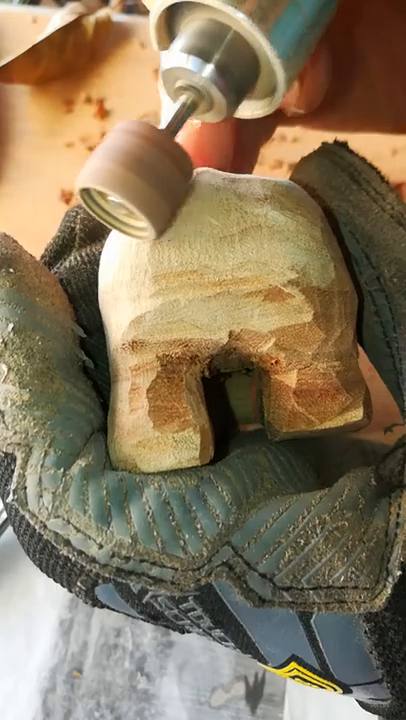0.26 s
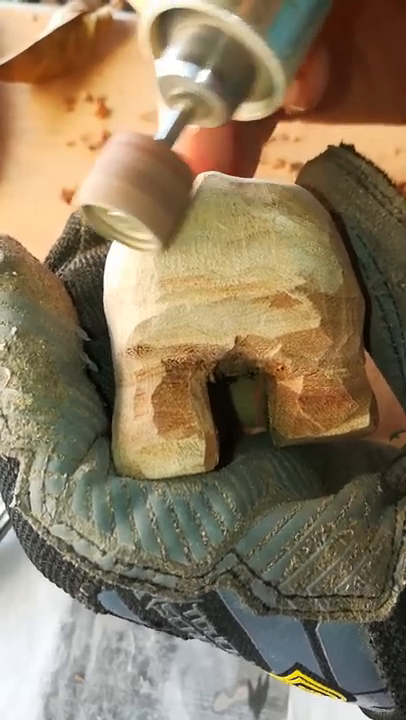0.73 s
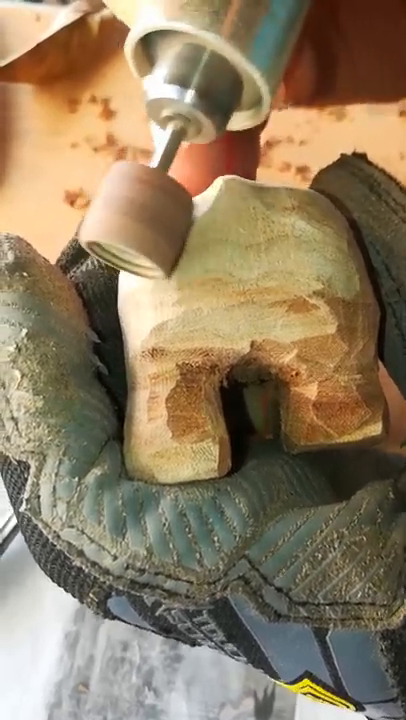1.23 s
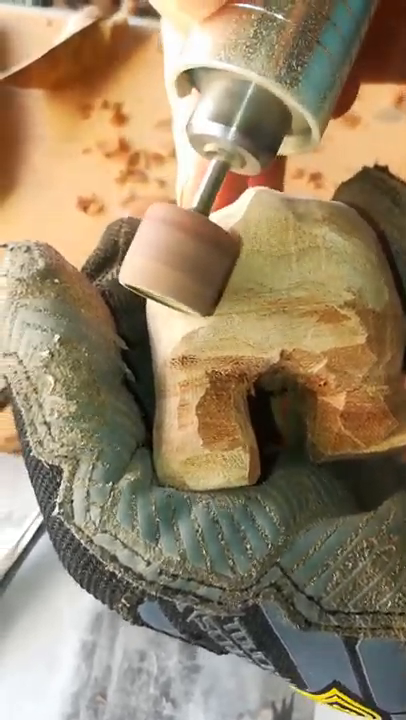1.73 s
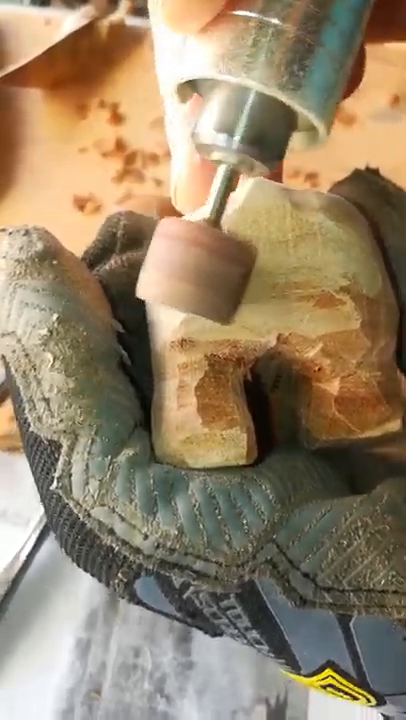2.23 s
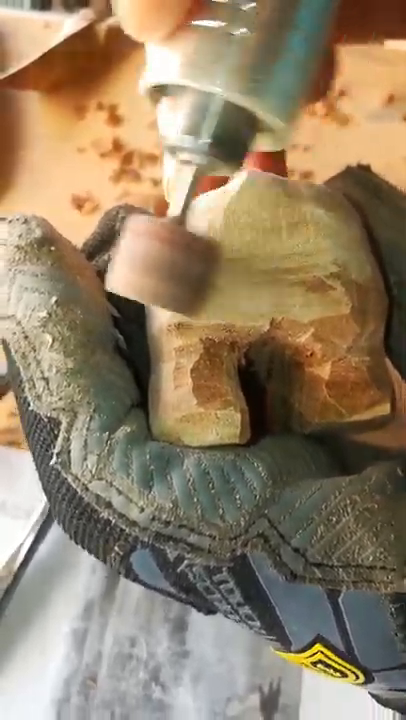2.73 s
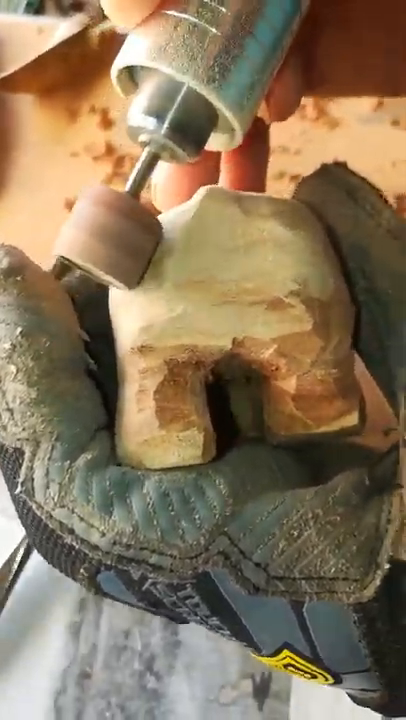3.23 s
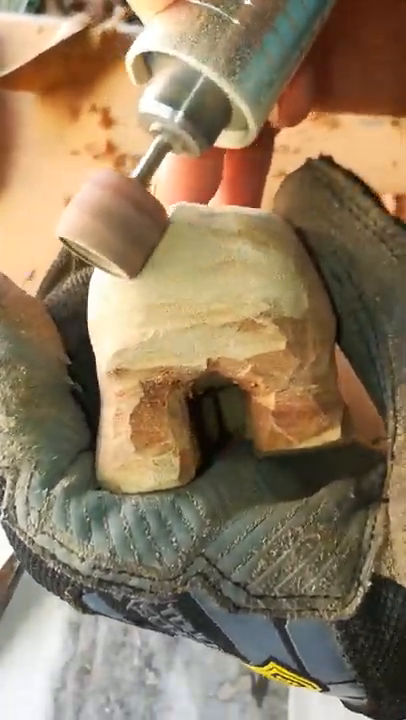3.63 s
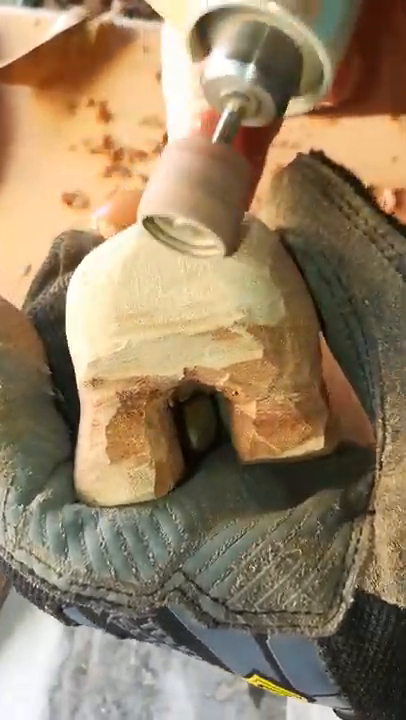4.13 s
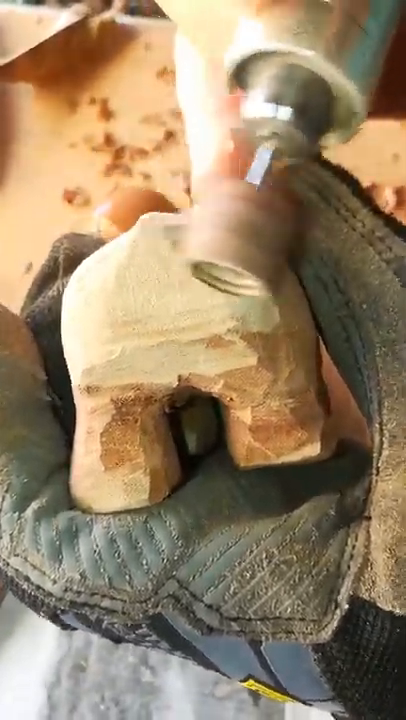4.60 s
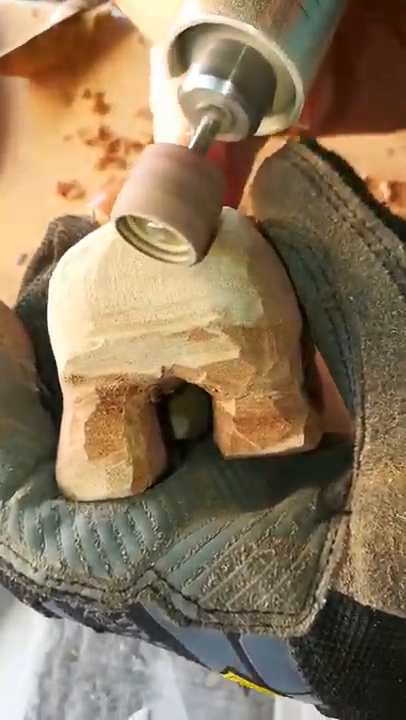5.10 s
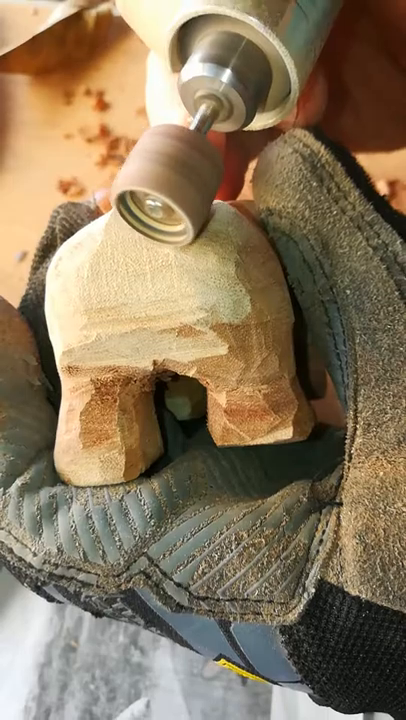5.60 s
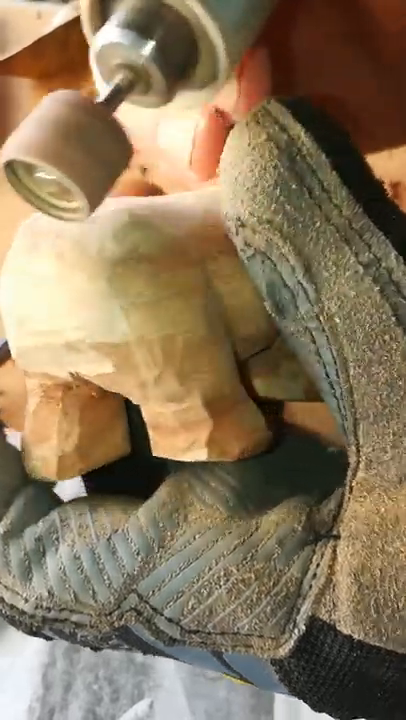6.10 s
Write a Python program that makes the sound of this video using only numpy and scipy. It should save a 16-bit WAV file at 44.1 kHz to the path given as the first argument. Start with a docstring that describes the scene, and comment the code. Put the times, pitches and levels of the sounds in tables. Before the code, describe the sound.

Close stereo sound of a small rotary tool sanding a hand-held wood carving, running continuously for about 6.3 seconds. A bright, grainy hiss dominates, pulsing very fast with the drum and ringing in the upper range; the left is edgier, the right finer. Beneath is a hum around 255 hertz with a buzzing knock, mostly left. Pressure grows, and from 1.5 to 1.8 and 2.1 to 2.4 seconds the drum skips, adding a rougher, lower growl, with a fainter trace near 2.8. The cut is hardest around 2.4. Soft, low handling bumps cluster from 2.8 to 3.8. At 3.8 to 4.2 the tool lifts: the buzz drops, the hiss softens slightly, and short bearing rattles chirp. Sanding resumes lighter; further lifts from 5.6 to 6.2 bring more rattles and a brief sharp bite near 5.9. Faint rumble and wavering low hum lie underneath.

```python
"""Grit scratches steadily as a small rotary tool sands a hand-held wood carving close to a two-port microphone.
The scratch is noise pulsing with the drum's turning; it rings the handpiece and the wood. Tones locked to
the shaft make the hum and the knock, and half orders come in as the drum skips every second turn.
The hand presses, tilts and lifts the tool; the loose bearing rattles mostly around the lifts.
Soft handling bumps come mostly midway, over a restless rumble, a faint hum and the workshop."""
import sys
import numpy as np
from scipy import signal
from scipy.fft import rfft, irfft
from scipy.io import wavfile
from scipy.ndimage import uniform_filter1d, map_coordinates

SR = 44100
rng = np.random.default_rng(int(sys.argv[2]) if len(sys.argv) > 2 else 0)


def master(y):
    """Save y as 16-bit WAV."""
    cut = np.clip(np.atleast_2d(y).T, -1, 1)
    pcm = np.round(cut * 32767)  # scale
    wavfile.write(sys.argv[1], SR, pcm.astype(np.int16))


N = 280035
T = np.arange(N) / SR
HZ = np.fft.rfftfreq(N, 1 / SR)
PORT_LAG_SAMPLES = 24  # the right port hears later


def gain_of(db):
    """Decibels to amplitude."""
    return 10 ** (np.asarray(db) / 20)


def evened(x):
    """Scales to rms 1."""
    return x / np.sqrt(np.mean(x ** 2) + 1e-20)


def curve(rows):
    """Each column of a time table, sample by sample."""
    s, *columns = np.transpose(rows)
    return np.squeeze([np.interp(T, s, c) for c in columns])


def spectrum(rows):
    """Each dB column of a frequency table as a gain per bin."""
    hz, *columns = np.transpose(rows)
    return gain_of([np.interp(np.log(HZ + 1), np.log(hz), c) for c in columns])


def colour(x, gain):
    """Filters by a gain per bin."""
    return irfft(rfft(x) * gain, N)


def highpass(corner_hz, power):
    """Gain per bin that falls away below a corner, where it is one half."""
    return HZ ** power / (HZ ** power + corner_hz ** power)


def peak(hz, width_hz):
    """A resonance of gain 1; the width is taken 3 dB down."""
    return 1 / (1 + ((HZ - hz) / (.78 * width_hz)) ** 2)


def drift(rate_hz):
    """Slow chance of rms 1: noise without its faster part, drawn at 1/64 of the rate."""
    slow = T[::64]
    hz = np.fft.rfftfreq(len(slow), slow[1])
    lines = rfft(rng.standard_normal(len(slow))) / (1 + (hz / rate_hz) ** 4)
    return evened(np.interp(T, slow, irfft(lines, len(slow))))


def ports(x, likeness):
    """Two unrelated signals become a partly alike pair; the right port hears the shared part later."""
    c = np.clip(likeness, 0, 1)
    return np.array([x[0], c * np.roll(x[0], PORT_LAG_SAMPLES) + np.sqrt(1 - c * c) * x[1]])


def burst(s, length_s):
    """A bell-shaped swell around time s; the length is its width at 1/e."""
    return np.exp(-(2 * (T - s) / length_s) ** 2)


def swells(rows):
    """A gain that rises or dips briefly at each row."""
    return gain_of(sum(db * burst(s, length_s) for s, length_s, db in rows))


def held(start_s, end_s, edge_s):
    """1 between two times, with smooth edges."""
    return .5 + .5 * np.sin(np.pi * np.clip(np.minimum(T - start_s, end_s - T) / edge_s, -.5, .5))


def follow(law, grip, waver_db, waver_hz=6):
    """A part's gain from pressure, lift and tilt; it wavers as the contact point shifts.

    Each law: level in dB at 0 dB pressure, dB per dB of pressure, dB when fully lifted, dB when fully tipped up.
    """
    db, slope, lifted_db, tilt_db = law
    pressure_db, lifted, tilt = grip
    level_db = db + slope * pressure_db + lifted_db * lifted + tilt_db * tilt
    return gain_of(level_db + waver_db * drift(waver_hz))


# Shaft speed before flutter. Each row: time in seconds, turns per second.
SPIN = [(0, 260), (.58, 256.3), (.97, 256.8), (1.4, 254.2), (2.3, 253.2), (3.2, 252.6), (3.85, 252.2),
        (4.19, 256), (4.29, 252), (4.37, 259.5), (4.44, 253), (4.59, 258), (4.67, 254.4), (4.89, 255.2),
        (5.5, 251.9), (5.8, 256), (6.35, 258.5)]


def shaft_turns():
    """Turns of the drum so far: the speed, with a fast and a slow unsteadiness, summed over time."""
    return np.cumsum(curve(SPIN) * (1 + .0025 * drift(30) + .0025 * drift(8))) / SR


# Hand pressure before tremor. Each row: time in seconds, pressure in dB.
PRESSURE = [(0, -1.5), (.45, -0.5), (.7, 0.5), (1.4, 0.5), (1.8, 2), (2.25, 2), (2.4, 3.5), (2.65, 2.5),
            (2.8, 1), (3.45, 1.55), (3.8, 1.1), (4.3, -0.5), (4.65, 1), (5.1, -3), (5.5, -2), (5.88, -1),
            (6.35, -2.5)]
# Drum off the wood. Each row: start in seconds, end in seconds, how far 0-1.
LIFTS = [(-.1, .12, 0), (3.818, 4.206, 0.94), (5.625, 5.863, 1), (5.9, 6.203, 1)]
# Nose tipped up toward the microphone. Each row: time in seconds, how far 0-1.
TILT = [(0, 0.16), (1.2, .15), (2.4, 0), (3.5, 0.42), (4.3, 0.7), (4.85, 1), (5.4, 0.82), (6.0, 0.36),
        (6.35, 0.17)]


def hand(tremor_db=0.35, tremor_hz=7, lift_edge_s=0.088):
    """The unsteady pressure in dB, how far the drum is off the wood, and the tilt."""
    pressure_db = curve(PRESSURE) + tremor_db * drift(tremor_hz)
    lifted = sum(far * held(start, end, lift_edge_s) for start, end, far in LIFTS)
    return pressure_db, lifted, curve(TILT)


# The drum skips every second turn. Each row: start in seconds, end in seconds, level in dB before the orders' own.
SKIPS = [(1.515, 1.83, -43), (2.067, 2.356, -43.5), (2.735, 2.903, -50)]


def skip_gain(edge_s=0.055):
    """Strength of the skipping, which builds and dies smoothly."""
    return sum(gain_of(db) * held(start, end, edge_s) for start, end, db in SKIPS)


# How deeply the scratch pulses, as fractions: once a turn, twice a turn, with the bearing cage, while skipping.
BUNCHING = (.13, .11, .09, .24)


def grit_grains(turns, skip, flicker_db=.5):
    """Noise of uneven grain size, bunched by the drum's turn, the bearing cage and the skipping."""
    once, twice, by_cage, by_skip = BUNCHING
    angle = 2 * np.pi * turns
    cage = np.cos(.4 * angle + drift(6)) + np.cos(.6 * angle + drift(3))
    press = 1 + once * np.cos(angle) + twice * np.cos(2 * angle) + by_cage * cage
    press = press + by_skip * skip / skip.max() * np.cos(angle / 2)
    size_db = 2.6 * np.minimum(rng.exponential(1, (2, N)), 3)
    grains = rng.standard_normal((2, N)) * gain_of(size_db)
    return evened(grains * press * gain_of(flicker_db * drift(27)))


# Colour of the scratch. Each row: frequency in Hz, left gain in dB, right gain in dB.
GRIT = [(300, -27, -17.5), (540, -29, -16.5), (882, -3.5, -10), (1310, -11, -6), (1740, 7, -6),
        (2460, 3, -4), (3960, 6.5, 2), (5300, 8.5, -0.5), (7940, 2.5, 10), (8700, 5.5, 8), (10400, 5, 7),
        (11600, 3.5, 4.5), (12700, 0, 4.5), (14300, 3.5, 0.5), (15500, 6, 6)]
# Laws of the scratch and of its top fizz, columns as in follow().
GRIT_LAW = (-27, 1, -1.5, 0)
FIZZ_LAW = (-27, 0.7, -6.5, 0)


def scratch(grains, grip, fizz_hz=9000):
    """The broad scratch of the grit; its top fizz follows its own law of contact."""
    whole = colour(ports(grains, likeness=0.21), spectrum(GRIT))
    fizz = colour(whole, highpass(fizz_hz, 6))
    body = follow(GRIT_LAW, grip, waver_db=0.73) * (whole - fizz)
    return body + follow(FIZZ_LAW, grip, waver_db=1.5) * fizz


def ring(grains, modes, likeness, radiate_hz=1100):
    """Resonances set ringing by the grains; small parts give off little bass."""
    power = sum((gain_of([[left], [right]]) * peak(hz, width)) ** 2 for hz, width, left, right in modes)
    return colour(ports(grains, likeness), np.sqrt(power) * highpass(radiate_hz, 4))


# Resonances. Each row: frequency in Hz, width in Hz, left gain in dB, right gain in dB.
BEARING_MODES = [(3070, 68, -17, -4), (5714, 446, 18.5, -2.5), (6480, 860, 13.5, -3)]
# Law, columns as in follow().
BEARING_LAW = (-29, -0.62, 0, 4)


def bearing_ring(grains, grip):
    """The bearing's resonances, weaker as the hand presses harder."""
    return follow(BEARING_LAW, grip, waver_db=0.9) * ring(grains, BEARING_MODES, likeness=0.56)


# Resonance. Each row: frequency in Hz, width in Hz, left gain in dB, right gain in dB.
CUT_MODES = [(7040, 890, 16.9, 2.3)]
# Law, columns as in follow().
CUT_LAW = (-30, 1.43, -7, -4.5)
# The drum's edge digs in. Each row: centre in seconds, length in seconds, gain in dB.
DIGS = [(2.45, 0.27, 0.5), (5.87, 0.05, 8)]


def cut_ring(grains, grip):
    """The ring of the cut, which grows with pressure and as the drum's edge digs in."""
    return follow(CUT_LAW, grip, waver_db=1.4) * swells(DIGS) * ring(grains, CUT_MODES, likeness=0.38)


# Resonances. Each row: frequency in Hz, width in Hz, left gain in dB, right gain in dB.
SHELL_MODES = [(8050, 290, 12.7, 18), (10150, 150, 3.7, 18.4), (10770, 250, 8, 18.9), (11440, 600, 3, 10.4)]
# Law, columns as in follow().
SHELL_LAW = (-28.5, 0.65, -3, -1)
# Fingers shift and damp or free the shell. Each row: centre in seconds, length in seconds, gain in dB.
REGRIPS = [(1.35, 0.48, -2), (2.98, .3, -5.5), (3.48, .35, 3), (6.2, 0.22, 0.5)]


def shell_ring(grains, grip):
    """The handpiece shell's resonances, damped or freed by the fingers."""
    return follow(SHELL_LAW, grip, waver_db=1.3) * swells(REGRIPS) * ring(grains, SHELL_MODES, likeness=.65)


# The drum's imbalance. Each row: time in seconds, level in dB before waver.
WOBBLE = [(0, -49.5), (.41, -47.5), (.74, -48), (1.33, -39.5), (2.0, -41.5), (2.17, -36.5), (2.75, -43),
          (3.0, -60), (3.4, -48), (4.3, -55.5), (4.55, -48.5), (5.6, -47.5), (5.72, -55), (6.35, -55.5)]


def wobble(turns, unsteady_db=2.0):
    """Hum of the off-centre drum: one sine at the turning rate."""
    level_db = curve(WOBBLE) + unsteady_db * drift(11.4)
    return gain_of(level_db) * np.sqrt(2) * np.cos(2 * np.pi * turns)


def harmonics(turns, orders, waver_db):
    """Lines locked to the shaft, each at a chance phase and wavering in strength."""
    lines = 0
    for order, db in orders:
        phase = 2 * np.pi * (order * turns + rng.random())
        lines = lines + gain_of(db + waver_db * drift(9.8)) * np.cos(phase)
    return np.sqrt(2) * lines


# Harmonics of the knock. Each row: multiple of the spin, relative level in dB.
KNOCK_ORDERS = [(6, -9.5), (7, -1.5), (8, -8.5), (9, -12), (10, -9.5), (12, -7.5)]
LOW_KNOCK_ORDERS = [(3, 1), (4, 5.5), (5, -4)]
# Laws, columns as in follow().
KNOCK_LAW = (-39.5, 0.93, -18, 2.5)
LOW_KNOCK_LAW = (-51.5, 0.2, -6.5, 2)
# The drum rides a hard spot. Each row: centre in seconds, length in seconds, gain of the low knock in dB.
HARD_SPOTS = [(1.35, .25, 3), (3.55, 0.39, 5)]


def knock(turns, skip, grip, skip_duck_db=-3.5):
    """Harmonics of the once-a-turn knock; hard spots raise the low ones, skipped turns weaken all."""
    high = follow(KNOCK_LAW, grip, waver_db=2.4) * harmonics(turns, KNOCK_ORDERS, waver_db=1.2)
    low = follow(LOW_KNOCK_LAW, grip, waver_db=1.1) * harmonics(turns, LOW_KNOCK_ORDERS, waver_db=2.15)
    return (high + low * swells(HARD_SPOTS)) * gain_of(skip_duck_db * skip / skip.max())


# Half orders of the skipping. Each row: multiple of the spin, relative level in dB.
SKIP_ORDERS = [(.5, -0.5), (1.5, -11), (2.5, -17), (3.5, -2.5), (4.5, -19), (5.5, 0), (6.5, 1.5),
               (7.5, -21)]


def skipping(turns, skip):
    """Contact on every second turn puts lines halfway between the harmonics."""
    return skip * harmonics(turns, SKIP_ORDERS, waver_db=0.2)


# Rotor and ball bearing tones. Each row: multiple of the spin, level in dB before the law.
ROTOR_ORDERS = [(2, -61), (2.6, -59)]
# Law, columns as in follow().
ROTOR_LAW = (4.5, -0.5, -1.5, -9.5)


def rotor_tones(grip):
    """Faint tones of the heavy rotor, which turns more evenly than the drum on its springy shaft."""
    turns = np.cumsum(uniform_filter1d(curve(SPIN), size=SR // 3)) / SR
    tones = 0
    for order, db in ROTOR_ORDERS:
        phase = 2 * np.pi * order * turns + .4 * drift(10)
        tones = tones + gain_of(db + 2 * drift(12)) * np.sin(phase)
    return follow(ROTOR_LAW, grip, waver_db=2.1) * np.sqrt(2) * tones


def whine(turns, skip, grip, right_db=-11):
    """All shaft tones at both ports; the far, right port is shaded above the bass."""
    tone = wobble(turns) + knock(turns, skip, grip) + skipping(turns, skip) + rotor_tones(grip)
    shade = gain_of(right_db / (1 + (520 / (HZ + 1)) ** 4))
    return np.array([tone, colour(np.roll(tone, PORT_LAG_SAMPLES), shade)])


# The loose bearing. Each row: centre in seconds, length in seconds, level in dB before port gains, frequency in Hz.
RATTLES = [(3.894, 0.016, -16, 6600), (3.929, 0.016, -21, 6100), (4.048, 0.017, -19.5, 6170),
           (4.194, .014, -18.5, 6050), (4.269, 0.02, -21, 5900), (5.597, .03, -28, 5050),
           (5.697, 0.049, -20, 6330), (5.875, 0.05, -18.5, 6800), (6.08, 0.013, -26, 6020),
           (6.27, 0.064, -31, 6550)]


def rattles(rate_hz=112, depth=0.62, width_hz=1500, spread=0.025, low_hz=2200, left_db=4, right_db=-5):
    """Short squeals of the loose bearing: fluttering noise through a resonance."""
    flutter_turns = np.cumsum(rate_hz * (1 + 0.1525 * drift(29.0))) / SR
    flutter = 1 + depth * np.cos(2 * np.pi * flutter_turns)
    noise = rfft(rng.standard_normal((2, N)) * flutter)
    out = np.zeros((2, N))
    for s, length_s, db, hz in RATTLES:
        gain = (peak(hz, width_hz) + spread * peak(hz, 7000)) * highpass(low_hz, 4)
        out += gain_of(db) * burst(s, length_s) * evened(irfft(noise * gain, N))
    return out * gain_of([[left_db], [right_db]])


def reflections(x, strength, count=10):
    """Echoes off hands and bench; their paths drift as the hands move, so fine ripples wander through the hiss."""
    out = x.copy()
    for port in (0, 1):
        for delay_s in np.geomspace(.002, .012, count) * rng.uniform(.85, 1.15, count):
            late = (delay_s + .00005 * drift(.7)) * SR
            out[port] += strength * map_coordinates(x[port], [np.arange(N) - late], order=2, mode="wrap")
    return out / np.sqrt(1 + count * strength ** 2)


def shaped(noise, gain):
    """Noise lines, coloured and brought to rms 1."""
    return evened(irfft(noise * gain, N))


# Handling near the microphone. Each row: centre in seconds, length in seconds, level in dB, frequency in Hz.
BUMPS = [(.55, 0.12, -56, 40), (2.564, .04, -52, 49.5), (2.853, 0.091, -39.5, 200), (2.966, 0.086, -43, 40),
         (3.095, 0.11, -35.5, 71.6), (3.147, 0.035, -44, 50), (3.208, 0.037, -35, 70),
         (3.292, 0.034, -36, 79.8), (3.368, 0.11, -48, 45), (3.62, 0.045, -36, 44.7), (3.697, .03, -47, 40),
         (3.76, .03, -47, 45.5), (4.746, 0.09, -46, 49.3)]


def bumps(noise):
    """Soft bumps and brushes of handling: short swells of low noise."""
    return sum(gain_of(db) * burst(s, length_s) * shaped(noise, peak(hz, 2 * hz) ** 2)
               for s, length_s, db, hz in BUMPS)


def rumble(noise, rumble_db=-64, swell_db=5.0):
    """Low noise whose level swells restlessly."""
    return gain_of(rumble_db + swell_db * drift(5.2)) * shaped(noise, peak(72, 160) ** 2)


# A wavering low hum. Each row: time in seconds, frequency of the lower tone in Hz, its level in dB.
HUM = [(0, 127.5, -66), (.7, 107.6, -60.5), (1.5, 94.7, -66), (2.6, 73.15, -58), (3.4, 105, -56.5),
       (4.3, 85.5, -58), (4.7, 77.2, -55.5), (5.0, 97, -55.5), (6.35, 110, -53.5)]


def hum(gap_hz=26.7, upper_db=-3):
    """A faint pair of low tones that glide together and beat."""
    hz, db = curve(HUM)
    angle = 2 * np.pi * np.cumsum(hz) / SR
    upper = gain_of(upper_db) * np.sin(angle + 2 * np.pi * gap_hz * T)
    return gain_of(db) * np.sqrt(2) * (np.sin(angle) + upper)


# Workshop spectrum. Each row: frequency in Hz, relative level in dB per Hz.
ROOM = [(20, -18), (55, -2), (100, -11), (200, 7), (290, 6.5), (390, -10.5), (570, -25), (820, -42),
        (1500, -46), (6000, -68)]


def room(noise, room_db=-59):
    """The workshop's steady low background: noise of a fixed spectrum."""
    return gain_of(room_db) * shaped(noise, spectrum(ROOM))


def scene():
    """One slightly unsteady shaft, pressed on and lifted by the hand, drives the scratch and the whine."""
    turns, grip, skip = shaft_turns(), hand(), skip_gain()
    grains = grit_grains(turns, skip)
    rings = bearing_ring(grains, grip) + cut_ring(grains, grip) + shell_ring(grains, grip)
    hiss = reflections(scratch(grains, grip) + rings + rattles(), strength=.125)
    low_noise = rfft(ports(rng.standard_normal((2, N)), likeness=1.0))  # one noise for all three below
    air = bumps(low_noise) + rumble(low_noise) + room(low_noise)
    return hiss + whine(turns, skip, grip) + air + hum()


def record(dry, edge_hz=15760):
    """The recorder's band limit: a steep low-pass filter."""
    lowpass = signal.firwin(2047, edge_hz, window=("kaiser", 9), fs=SR)
    return signal.oaconvolve(dry, lowpass[None], "same")


dry = scene()
out = record(dry)
master(out)
```